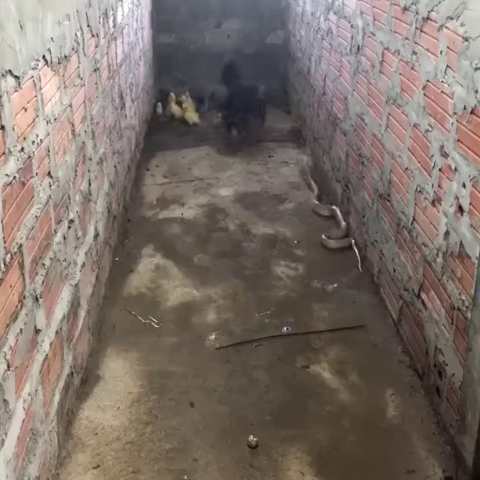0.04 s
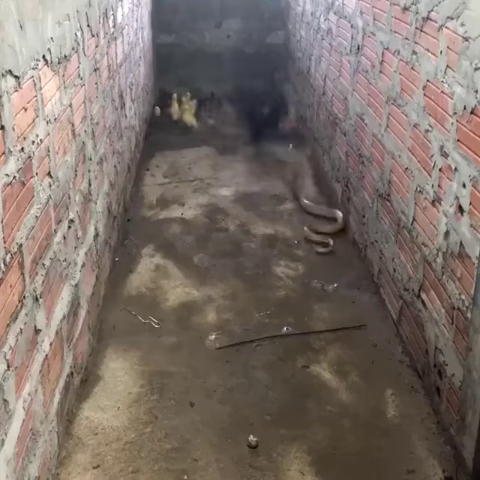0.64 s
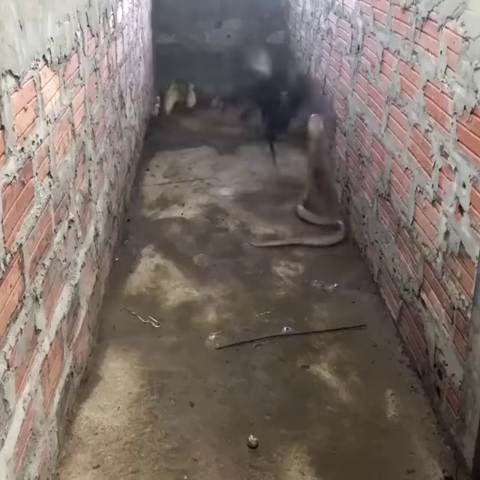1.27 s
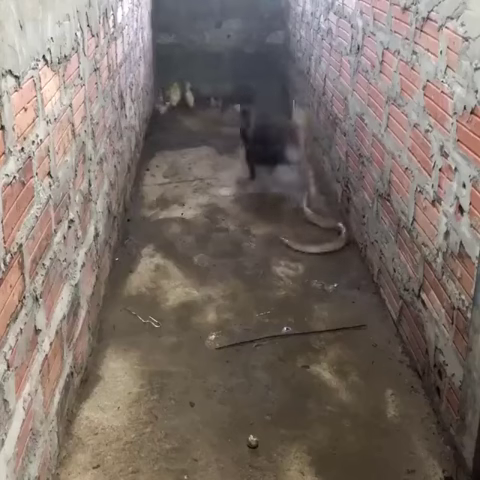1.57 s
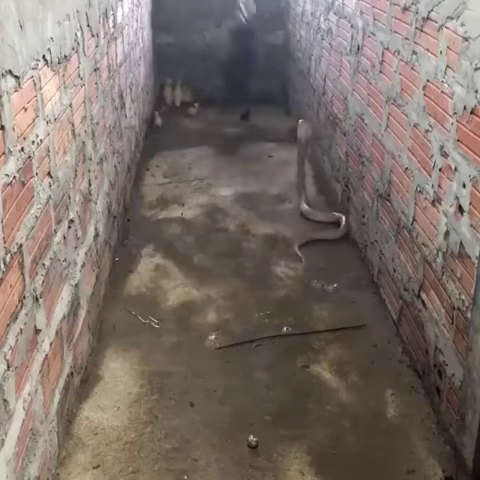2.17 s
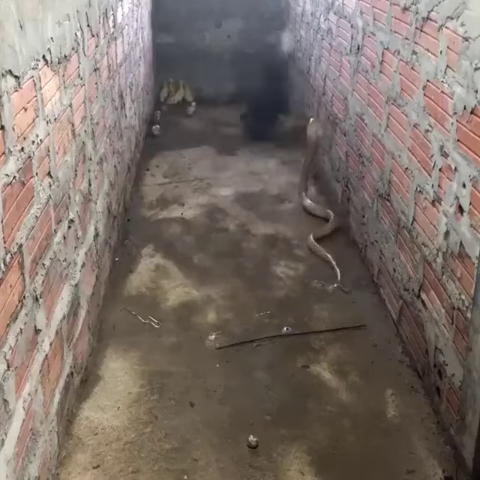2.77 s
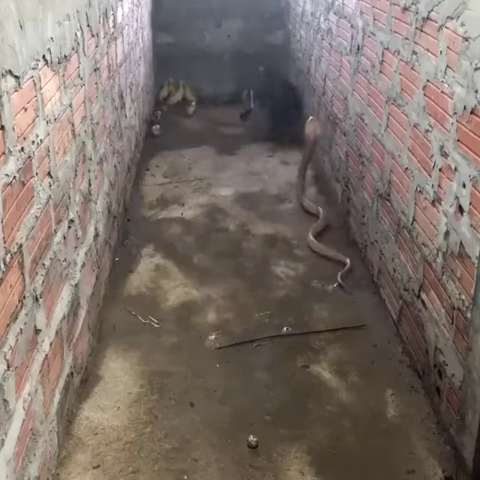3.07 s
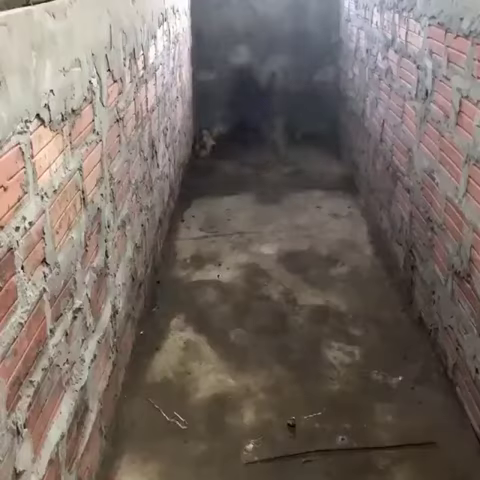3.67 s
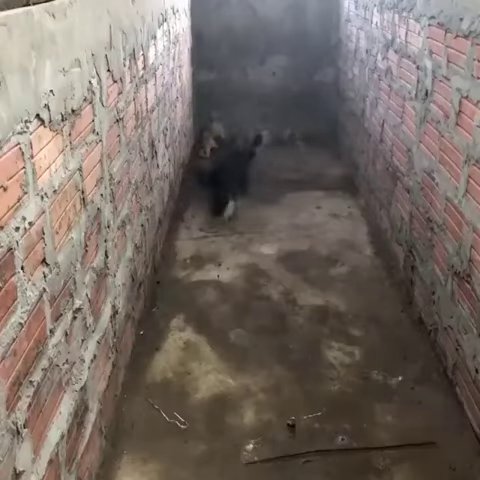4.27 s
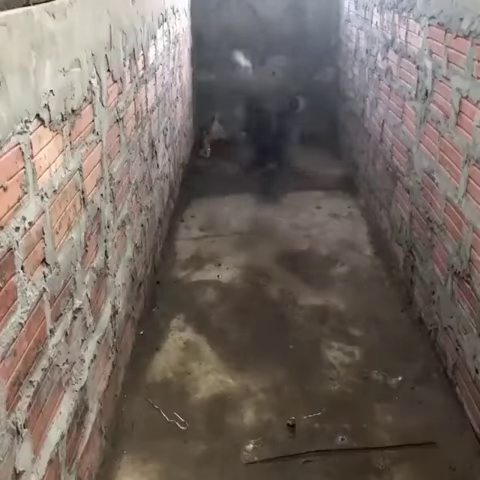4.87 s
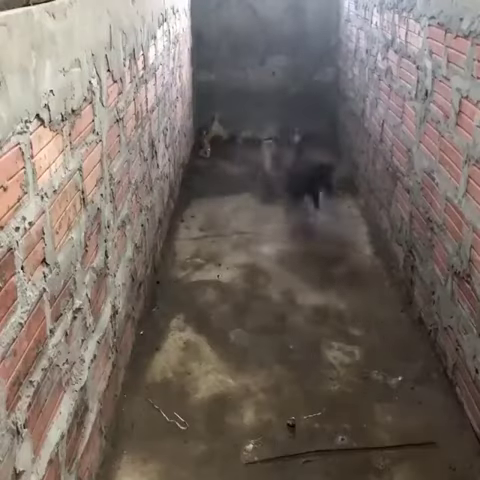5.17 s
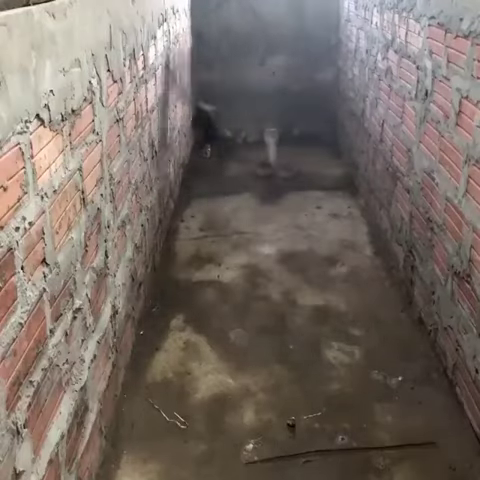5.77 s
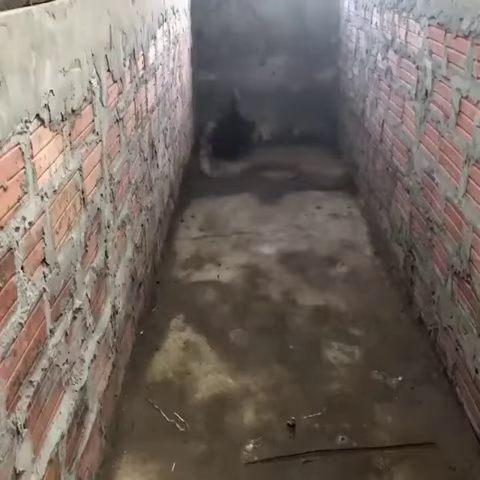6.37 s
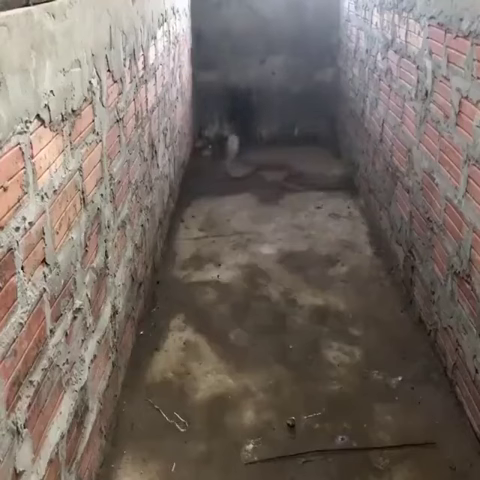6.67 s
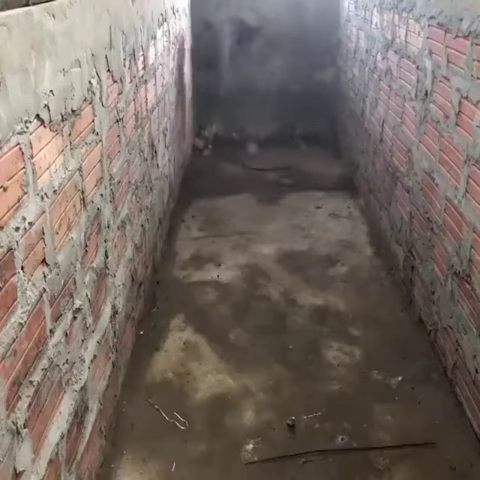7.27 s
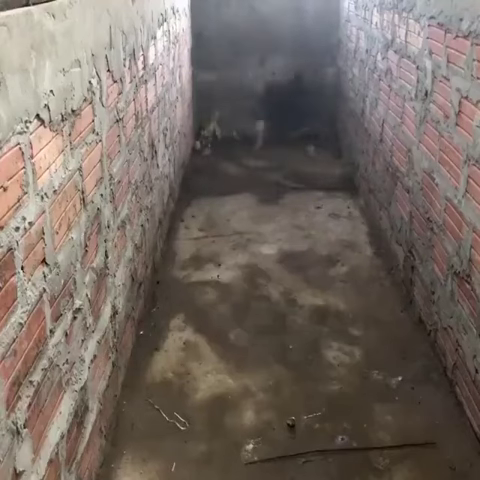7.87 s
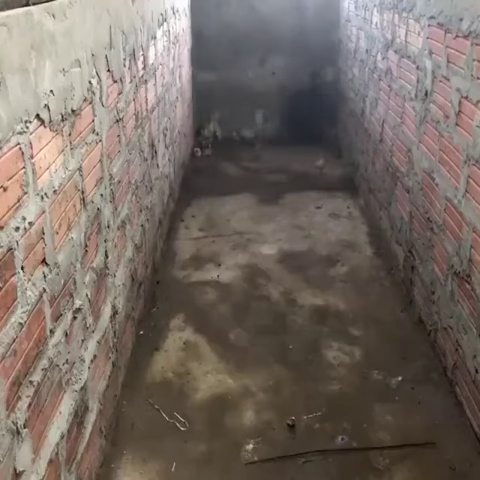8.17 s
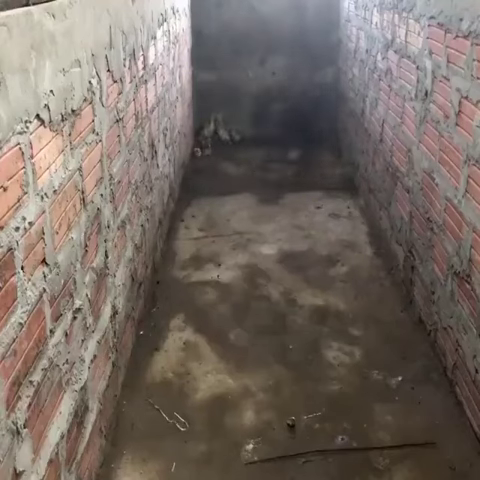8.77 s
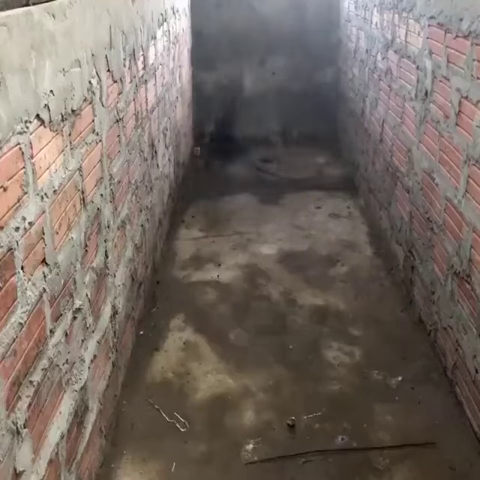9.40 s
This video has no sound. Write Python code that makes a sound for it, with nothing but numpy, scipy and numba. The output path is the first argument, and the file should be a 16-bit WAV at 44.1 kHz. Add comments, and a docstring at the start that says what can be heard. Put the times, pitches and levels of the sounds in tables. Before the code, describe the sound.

A hen clucks rapidly in alarm, breaking into hoarse squawks as her wings flap and her claws scrape on concrete. About halfway through she starts screeching, raspy cries mixed with more clucks and dull landing thuds. Chicks give occasional high, falling cheeps, more often toward the end. Everything comes from the far end of a narrow brick passage with a short echo, over a faint outdoor hum and a pulsing insect.

```python
"""A hen clucks, barks and screeches as she fights off a snake at the far end of a narrow brick passage.
Her syrinx buzzes through a ringing throat and an open beak, and rasps when she drives it hard.
Her wings push air and rub their feathers, she lands with thuds, her claws scrape, and one hard tick rings.
Her chicks whistle falling cheeps, and the two walls throw every call back and forth.
The passage is open to the sky: an insect pulses faintly over a distant outdoor hum."""
import sys
import numpy as np
from scipy import signal
from scipy.fft import rfft, irfft, next_fast_len
from scipy.io import wavfile
from scipy.ndimage import uniform_filter1d
from numba import njit

SR = 44100
rng = np.random.default_rng(int(sys.argv[2]) if len(sys.argv) > 2 else 0)


def file_out(sig):
    """Save sig as 16-bit WAV at sys.argv[1]."""
    # one column per channel
    cols = np.atleast_2d(sig).T
    # limit, then scale
    lim = np.clip(cols, -1, 1)
    pcm = np.round(lim * 32767).astype(np.int16)
    wavfile.write(sys.argv[1], SR, pcm)


N = 425124
TIME = np.arange(N) / SR
CUTOFF_HZ = 15650


def from_db(db):
    """Decibels to gain."""
    return 10 ** (np.asarray(db) / 20)


def rms_one(x):
    """Scale to unit power."""
    return x / np.sqrt(np.mean(x ** 2) + 1e-20)


def even(x):
    """Hold the power at 1 over a few voice cycles."""
    return x / np.sqrt(uniform_filter1d(x ** 2, size=400) + 1e-12)


def at_hz(points, hz):
    """Read a table on a log-frequency axis."""
    knots, values = np.transpose(points)
    return np.interp(np.log(np.maximum(hz, 1)), np.log(knots), values)


def band(x, low_hz, high_hz, order=2):
    """Butterworth band-pass."""
    edges = [low_hz, min(high_hz, SR * .45)]
    return signal.sosfilt(signal.butter(order, edges, "band", fs=SR, output="sos"), x)


def hiss(low_hz, high_hz, order=2):
    """A scene-long band of noise at unit power."""
    return rms_one(band(rng.standard_normal(N), low_hz, high_hz, order))


def coloured(spectrum, size):
    """Noise with the given spectrum, at unit power."""
    padded = next_fast_len(size)
    gain = from_db(at_hz(spectrum, np.fft.rfftfreq(padded, 1 / SR)))
    return rms_one(irfft(rfft(rng.standard_normal(padded)) * gain, padded)[:size])


def wander(t, per_s):
    """Random modulation that changes course per_s times a second; spread near 1."""
    steps = (t - t[0]) * per_s
    return np.interp(steps, np.arange(len(t) // 8), rng.standard_normal(len(t) // 8))


def window(start, end):
    """Sample indices between two times."""
    return np.arange(max(int(start * SR), 0), min(int(end * SR), N))


def swell(t, rise_s, fall_s):
    """Exponential rise to 1 at t = 0, then exponential fall."""
    return np.exp(np.minimum(t / rise_s, -t / fall_s))


@njit
def resonate(x, hz, width_hz):
    """A resonant filter whose centre sweeps."""
    y, r = np.zeros(len(x)), np.exp(-np.pi * width_hz / SR)
    for i in range(2, len(x)):
        drive = (1 - r[i] ** 2) / 2 * (x[i] - x[i - 2])
        y[i] = drive + 2 * r[i] * np.cos(2 * np.pi * hz[i] / SR) * y[i - 1] - r[i] ** 2 * y[i - 2]
    return y


# The tone of the outdoor bed. Each row: frequency in Hz, relative level in dB.
HUM_SPECTRUM = [(25, -45), (48, -1), (85, 4), (150, -11.5), (260, -2), (450, -20), (4000, -33),
                (15000, -41)]
def outdoor_hum(level_db=-51.5):
    """A steady, distant bed of low noise."""
    return from_db(level_db) * coloured(HUM_SPECTRUM, N)


def insect(level_db=-59, pulses_per_s=9.6):
    """A thin, high, pulsing chirr."""
    pulse = (.5 + .5 * np.cos(2 * np.pi * pulses_per_s * TIME)) ** 2
    return from_db(level_db) * pulse * hiss(6000, 7100, order=3)


# The passage's reverb. Each row: frequency in Hz, seconds to decay by 60 dB.
BRICK_DECAY = [(100, 0.8), (600, 0.56), (1200, 0.49), (2500, 0.47), (5000, 0.23), (14000, 0.58)]
def diffuse_tail(build_s=.0018):
    """Scatter from the rough brick, the lows ringing longest; unit energy."""
    t = TIME[:SR * 3 // 4]
    white = rng.standard_normal((2, len(t)))
    edges = np.geomspace(50, 18000, 10)
    tail = np.zeros(len(t))
    for k, (low, high) in enumerate(zip(edges, edges[1:])):
        decay_s = at_hz(BRICK_DECAY, np.sqrt(low * high))
        tail += band(white[k % 2], low, high) * from_db(-60 * t / decay_s)
    tail *= 1 - np.exp(-t / build_s)
    return tail / np.linalg.norm(tail)


def passage(x, crossing_s=.0043, wall_gain=.82, echo_db=-5, tail_db=-4):
    """Quick echoes between the two walls and a diffuse tail; both shift as the birds run about."""
    out, index = x.copy(), np.arange(N)
    for bounce in range(6):
        delay_s = crossing_s * (bounce + 1.3 + .2474 * wander(TIME, 2))
        out += from_db(echo_db) * wall_gain ** bounce * np.interp(index - delay_s * SR, index, x)
    blend = 2 * wander(TIME, 2)
    tail_a, tail_b = (signal.fftconvolve(x, diffuse_tail())[:N] for _ in range(2))
    tail = np.cos(blend) * tail_a + np.sin(blend) * tail_b
    return (out + from_db(tail_db) * tail) / np.sqrt(2)


# The chicks' cues. Each row: start in seconds, top pitch in Hz, level of the slide in dB.
CHEEP_CUES = [(1.283, 5480, -42), (2.799, 6060, -35), (4.252, 4690, -38), (4.523, 4920, -37.5),
              (5.874, 4940, -40), (6.68, 5030, -37.5), (6.974, 5030, -40), (8.015, 5430, -31),
              (8.476, 5360, -30), (9.044, 5210, -39.5), (9.259, 5250, -37.5), (9.365, 5200, -51),
              (9.5, 5340, -34)]
# A cheep's pitch curve. Each row: seconds from its start, share of the top pitch.
CHEEP_GLIDE = [(0, 0.58), (.015, 0.99), (.04, .94), (.068, .75), (.095, .63), (0.116, 0.61)]
def chicks(arch_db=-8, overtone_db=-23):
    """Nearly pure whistles that arch softly, then slide down louder."""
    out = np.zeros(N)
    times, shares = np.transpose(CHEEP_GLIDE)
    for start, top_hz, level_db in CHEEP_CUES:
        at = window(start, start + times[-1])
        t = TIME[at] - start
        hz = top_hz * np.interp(t, times, shares) * (1 + .012 * wander(t, 185))
        phase = 2 * np.pi * np.cumsum(hz) / SR
        whistle = np.sin(phase) + from_db(overtone_db) * (np.sin(2 * phase) + np.sin(3 * phase))
        contour_db = np.interp(t, [.045, .075], [arch_db, 0]) + 3.1 * wander(t, 105)
        out[at] += from_db(level_db + contour_db) * signal.windows.tukey(len(t), .3) * whistle
    return out


# The tick's ringing modes. Each row: frequency in Hz, relative level in dB.
TICK_RING = [(2670, -1), (3984, -2), (4447, -5), (5050, -1), (6062, 2), (6481, -7)]
def tick(start_s=4.406, ring_db=-34, fall_s=.026):
    """A sharp crack with a thin ring, like a flicked chip of brick."""
    t = np.maximum(TIME - start_s, 0)
    ring = rms_one(sum(from_db(db) * np.sin(2 * np.pi * hz * t) for hz, db in TICK_RING))
    crack = from_db(7) * hiss(1200, 10000, order=1) * np.exp(-2 * t / fall_s)
    return from_db(ring_db) * (TIME > start_s) * (ring * np.exp(-t / fall_s) + crack)


# The scrape cues. Each row: onset in seconds, relative level in dB.
SCRAPE_CUES = [(0.412, -50), (0.7282, -30), (0.8944, -39), (0.9338, -33), (1.2655, -37), (1.4257, -33.5),
               (1.4994, -33), (1.718, -20), (2.9128, -29), (2.9994, -38), (3.0994, -45), (3.3294, -42),
               (3.6172, -46), (4.1076, -42), (4.245, -45), (4.4712, -40), (4.578, -36), (4.711, -32),
               (5.9412, -30.5), (6.038, -31.5), (6.4694, -23.5), (7.7644, -33.5), (7.8644, -32.5),
               (8.1794, -32), (8.737, -19), (8.904, -19), (9.5986, -31)]
def claws(gain_db=1.5, rise_s=.0063, fall_s=.012):
    """Claws and quills drag on the concrete in short, dry, gritty scrapes."""
    force = np.zeros(N)
    for onset, level_db in SCRAPE_CUES:
        at = window(onset - .02, onset + .1)
        force[at] += from_db(level_db + gain_db) * swell(TIME[at] - onset - rise_s, rise_s, fall_s)
    grit = from_db(2.8 * wander(TIME, 900))
    return force * grit * hiss(1700, 10700, order=1)


# Her weight comes down. Each row: peak time in seconds, level in dB.
LANDING_CUES = [(4.181, -36.5), (5.361, -28), (5.44, -25), (5.939, -30), (7.581, -31), (7.775, -23),
                (7.878, -23), (8.46, -30), (8.97, -37)]
def landings(thud_hz=85, sweep_s=.011, scuff_db=-6):
    """The braking wings push a gust whose pitch drops fast into a dull thud."""
    out = np.zeros(N)
    scuff = from_db(scuff_db) * hiss(75, 940)
    for peak, level_db in LANDING_CUES:
        at = window(peak - .03, peak + .1)
        t = TIME[at] - peak
        hz = thud_hz * (1 + .5 * np.exp(-t / sweep_s))
        thud = np.sqrt(2) * np.sin(2 * np.pi * np.cumsum(hz) / SR)
        out[at] += from_db(level_db) * swell(t, rise_s=.012, fall_s=.025) * (thud + scuff[at])
    return out


# The wing beats. Each row: peak time in seconds, relative level in dB.
FLAP_CUES = [(0.654, -33), (.744, -30.5), (1.306, -35), (1.537, -36), (1.628, -25), (1.739, -34),
             (1.872, -34), (2.222, -40), (2.846, -38), (3.8, -31), (3.878, -25), (4.01, -31),
             (4.125, -35.5), (4.609, -36.5), (4.808, -33.5), (5.202, -33.5), (5.448, -31.5), (6.063, -33),
             (6.155, -38), (7.011, -33.5), (7.36, -27.5), (8.668, -28), (8.762, -31.5), (8.919, -35),
             (9.611, -33)]
# The swish of rubbing feathers. Each row: frequency in Hz, relative level in dB.
FEATHER_SPECTRUM = [(200, -1), (500, 3.5), (1300, 1), (3500, -3.5), (8200, -9), (15500, -13.5)]
def wings(thump_db=1.8, rustle_db=-52):
    """Each beat pushes a lump of air, its pitch dropping as the wing slows, and rubs the feathers."""
    push, rub = np.zeros(N), np.zeros(N)
    air_hz_db = [(40, -35), (80, 9.5), (125, -5.5), (220, -6), (450, -2.5), (1200, -8), (5000, -94)]
    air = coloured(air_hz_db, N)
    for peak, level_db in FLAP_CUES:
        at = window(peak - .07, peak + .15)
        t = TIME[at] - peak
        hz = 75.168 + 37.44 * np.exp(-np.maximum(t, -.03) / .015)
        hz *= 1 + .118 * wander(t, 120.3)
        whoop = np.sin(2 * np.pi * (np.cumsum(hz) / SR + rng.random()))
        push[at] += from_db(level_db) * swell(t, .014, .021) * (1.2 * whoop + .7 * air[at])
        rub[at] += from_db(level_db) * swell(t, .02, .032)
    astir = np.interp(TIME, [.5, .7, 8.9, 9.2], [0, 1, 1, 0])   # ruffled plumage rustles between beats
    rub += from_db(rustle_db) * astir * from_db(5 * wander(TIME, 22))
    grain = from_db(3 * wander(TIME, 500))
    return from_db(thump_db) * push + rub * grain * coloured(FEATHER_SPECTRUM, N)


# The upper resonances of her windpipe and beak. Each row: frequency in Hz, relative level in dB.
BEAK_SPECTRUM = [(1800, 2), (3300, -110), (4500, -8), (5100, -5), (5800, -1), (7600, -7.5), (8200, -11),
                 (9000, -10.5), (15000, -23)]
def hen_voice(t, pitch, throat_hz, rough, level_db, treble_db, mouth_hz,
              fundamental_db=-14, upper_db=-4, jitter=.053, leak_db=-23, mouth_width_hz=520):
    """The syrinx buzzes through throat and beak; driven hard it wobbles, doubles its period and rasps."""
    rough = np.clip(rough, 0, 1)
    hz = pitch * (1 + jitter * rough * (wander(t, 500.7) + .5 * wander(t, 110.2)))
    phase = 2 * np.pi * np.cumsum(hz) / SR
    multiples = np.arange(2, 49)[:, None] / 2
    strength = np.where(multiples % 1, rough, 1)   # strong and weak cycles add lines between harmonics
    flicker = from_db(4.5 * np.array([wander(t, 55) for _ in multiples]))
    partials = strength * flicker * np.cos(multiples * phase) * (multiples * pitch < CUTOFF_HZ)
    air = rough ** 2 * (1 + np.cos(phase))   # air escapes once a cycle
    buzz = rms_one(partials.sum(axis=0)) + air * rng.standard_normal(len(t))

    width_hz = (.3 + .3 * rough ** 2) * throat_hz * np.sqrt(throat_hz / 1300)
    ringing = resonate(resonate(buzz, throat_hz, width_hz), throat_hz, width_hz)
    throat = band(ringing + from_db(leak_db) * buzz, 440, 2900, order=3)
    slack = 2 * pitch / throat_hz   # the fundamental fades as the throat tightens
    fundamental = from_db(fundamental_db) * slack * flicker[0] * np.sin(phase)

    mouth = band(resonate(buzz, mouth_hz, np.full(len(t), mouth_width_hz)), 2300, 6000)
    beak_partials = partials * from_db(at_hz(BEAK_SPECTRUM, multiples * pitch))
    upper = rms_one(beak_partials.sum(axis=0)) + air * coloured(BEAK_SPECTRUM, len(t))
    treble = even(even(mouth) + from_db(upper_db) * upper)
    return from_db(level_db) * (even(throat) - fundamental) + from_db(treble_db) * treble


def short_call(start, length, pitch, throat_hz, rough, level_db, treble_db, mouth_hz=3800):
    """A soft lead-in breaks into full voice: pitch, resonances and loudness arch together."""
    out = np.zeros(N)
    at = window(start, start + length)
    course = np.clip((TIME[at] - start) / length, 0, 1) ** (1.1 - .2894 * rough)   # harsh calls peak early
    stages = [0, .2, .27, .6, .8, 1]
    arch = np.interp(course, stages, [.7, .77, .93, 1, .84, .82])
    body_db = level_db + np.interp(course, stages, [-14, -6, 1, 1.5, 0, -6])
    edge_db = treble_db + np.interp(course, stages, [-5.5, -4, 7, 8, -6.5, -7])
    fade = np.clip(np.minimum(course, 1 - course) / .012, 0, 1)
    voice = hen_voice(TIME[at], pitch * arch, throat_hz * arch, rough, body_db, edge_db, mouth_hz * arch)
    out[at] = fade * voice
    return out


# Her barks as she strikes. Each row: start and length in seconds, throat resonance in Hz, level in dB.
BARK_CUES = [(0.568, 0.069, 1370, -30), (0.641, 0.068, 1660, -26), (1.589, .055, 1600, -21),
             (1.697, 0.049, 2110, -20.5), (1.752, 0.074, 2050, -19), (1.831, .05, 1580, -17),
             (3.772, .044, 2400, -18), (3.851, 0.054, 1850, -20.5), (3.955, .05, 1560, -27.5),
             (4.061, 0.041, 1660, -32)]
def barks(top_hz=692.6, rough=.855, bright_db=-9.5):
    """Hoarse calls forced through a tight throat, all at one strained pitch."""
    return sum(short_call(start, length, top_hz, throat_hz, rough, level_db, level_db + bright_db)
               for start, length, throat_hz, level_db in BARK_CUES)


# Her clucks. Each row: start and length in seconds, top pitch in Hz, level in dB.
CLUCK_CUES = [(0.437, 0.053, 531, -43.5), (0.502, 0.055, 631, -37), (0.71, 0.044, 625, -23),
              (0.78, .053, 621, -17), (0.852, 0.03, 493.5, -20.5), (0.924, 0.036, 522, -21),
              (1.055, .045, 450, -24.5), (1.223, 0.044, 580, -28.5), (1.345, .046, 582, -28),
              (1.46, 0.059, 607, -25.5), (1.641, 0.061, 648.5, -19), (1.961, .055, 639, -16.5),
              (2.114, .063, 686, -19.5), (2.267, 0.054, 595, -16.5), (2.408, 0.065, 563, -20.5),
              (2.499, .037, 624, -18.5), (2.64, 0.064, 563, -23), (2.864, .04, 586.5, -22),
              (2.939, 0.05, 518, -18.5), (3.092, 0.057, 599.5, -23.5), (3.311, 0.042, 555, -27),
              (3.385, 0.04, 566, -23.5), (3.6, 0.039, 469.4, -26.5), (3.69, 0.032, 557, -21),
              (4.646, 0.046, 472, -24), (4.936, .07, 744.6, -16), (5.081, 0.071, 685, -17),
              (6.427, 0.079, 655.3, -17.5), (6.57, 0.09, 673.4, -17.5), (6.77, 0.077, 651.7, -16.5),
              (6.885, 0.059, 645.7, -15), (7.667, 0.081, 595, -21.5), (8.109, 0.057, 752, -16.5),
              (8.3, 0.08, 606.3, -21), (9.016, 0.063, 562, -17.5), (9.303, 0.07, 550, -26.5),
              (9.509, 0.046, 628, -25), (9.622, 0.04, 537, -18.5)]
# Her throat rings near the second harmonic, lower on soft clucks.
# Each row: cluck level in dB, resonance as a multiple of the pitch.
THROAT_BY_LEVEL = [(-29.5, 1.35), (-25.5, 1.95), (-17, 2.25)]
def clucks(treble_per_db=.745, treble_db_per_s=93):
    """The throat follows the pitch; loud and long clucks open the beak and come out brighter."""
    out = np.zeros(N)
    roughness = .48 + .039 * rng.standard_normal(len(CLUCK_CUES))
    for (start, length, pitch, level_db), rough in zip(CLUCK_CUES, roughness):
        throat_hz = pitch * np.interp(level_db, *np.transpose(THROAT_BY_LEVEL))
        # brightness pivots on a middling cluck: -20 dB, 55 ms long
        bright_db = -11 + treble_per_db * (level_db + 20) + treble_db_per_s * (length - .055)
        out += short_call(start, length, pitch, throat_hz, rough, level_db, level_db + bright_db)
    return out


# Her screeches. Each row: start, break and end in seconds, opening pitch in Hz, the rasp's throat
# resonance in Hz, its roughness from 0 to 1, opening level in dB, level at the break in dB.
SCREECH_CUES = [(4.783, 4.845, 4.882, 760, 2150, 0.68, -22.5, -12.5),
                (5.256, 5.351, 5.455, 673.4, 1850, 0.66, -16, -22.5),
                (5.489, 5.576, 5.63, 831, 1880, 0.48, -38, -15.5),
                (5.727, 5.813, 5.88, 792, 1480, 0.83, -18, -17.5),
                (6.087, 6.286, 6.35, 767, 1620, 0.69, -31, -18),
                (7.061, 7.193, 7.258, 821.6, 1960, 0.48, -26.5, -15),
                (7.329, 7.42, 7.468, 789.4, 1560, .7, -19, -15.5),
                (7.462, 7.49, 7.585, 720.5, 1500, 0.54, -17, -15.5),
                (7.908, 7.976, 8.012, 812.5, 2360, .8, -27, -19.5),
                (8.591, 8.671, 8.7, 679, 1627, 0.38, -17.5, -26),
                (8.693, 8.846, 8.89, 726, 2210, 0.7, -16, -20.5),
                (8.888, 8.933, 8.98, 689.6, 1960, 0.94, -11, -21)]
# The treble of a wholly rough screech: its level in dB at the start, the break and the end.
ROUGH_TREBLE_DB = [-28.5, -20, -31.5]
def screeches(attack_s=.014, opening_s=.025, break_s=.0057, spent_s=.025, release_s=.033,
              sag_per_s=1.0, clean_treble_db=8.5):
    """A ragged rasp breaks into a clear, falling tone; the mouth resonance climbs as the beak gapes."""
    out = np.zeros(N)
    for start, breaks, end, opening_hz, rasp_hz, rasp_rough, opening_db, break_db in SCREECH_CUES:
        at = window(start, end)
        t = TIME[at]
        shut = np.exp((start - t) / opening_s)   # pitch and throat scoop up as the beak opens
        clear = .5 + .5 * np.tanh((t - breaks) / break_s)   # 0 in the rasp, 1 in the tone
        spent = np.exp((t - end) / spent_s)   # pitch and level fall away as her air runs out
        pitch = opening_hz * np.exp(-sag_per_s * (t - start)) * (1 - .11 * shut) * (1 - .2 * spent)
        throat_hz = (1 - clear) * rasp_hz * (1 - .26 * shut) + clear * 2.217 * pitch
        mouth_hz = np.interp(clear, [0, 1], [2960, 3960])
        rough = np.interp(clear, [0, 1], [rasp_rough, .2])
        upper_db = np.interp(clear, [0, 1], [-4.5, 3])
        level_db = np.interp(t, [start, breaks], [opening_db, break_db]) + clear - 3 * spent
        treble_db = np.interp(t, [start, breaks, end], ROUGH_TREBLE_DB)
        treble_db += clean_treble_db * (1 - rasp_rough)
        surge = from_db(5 * rough * wander(t, 43))
        fade = np.clip(np.minimum((t - start) / attack_s, (end - t) / release_s), 0, 1)
        out[at] += fade * surge * hen_voice(t, pitch, throat_hz, rough, level_db, treble_db, mouth_hz,
                                            fundamental_db=-18, upper_db=upper_db)
    return out


def scene():
    """The fight echoes over a dry bed; it is all at the far end, so both channels hear the same."""
    fight = clucks() + barks() + screeches() + wings() + landings() + claws() + tick() + chicks()
    mix = passage(fight) + insect() + outdoor_hum()
    return np.array([mix, mix])


def record(dry):
    """Soft clipping rounds the peaks and a steep low-pass cuts the top."""
    rounded = .9 * np.tanh(dry / .9)
    return signal.sosfilt(signal.ellip(10, .2, 80, CUTOFF_HZ, fs=SR, output="sos"), rounded)


dry = scene()
out = record(dry)
file_out(out)
```